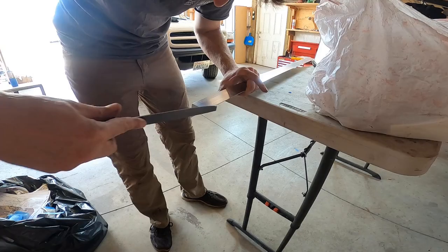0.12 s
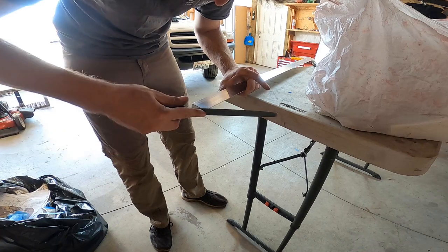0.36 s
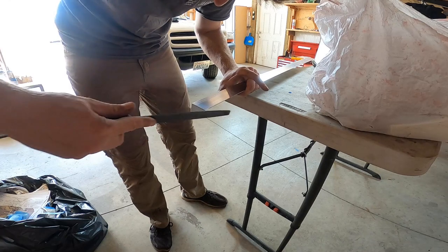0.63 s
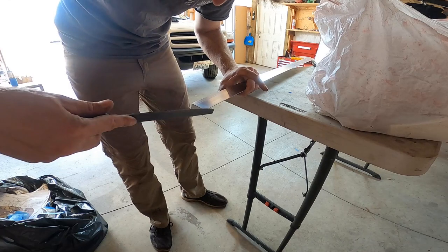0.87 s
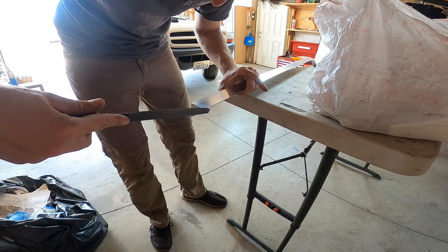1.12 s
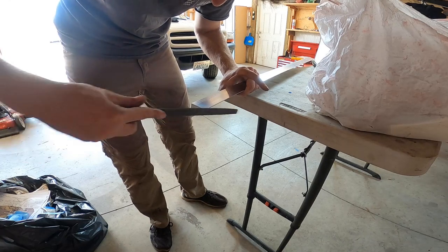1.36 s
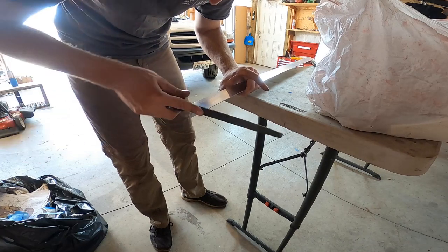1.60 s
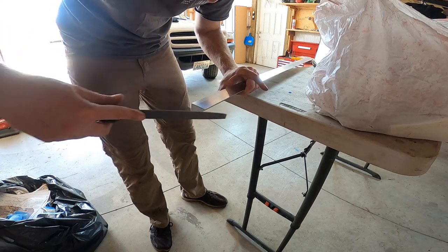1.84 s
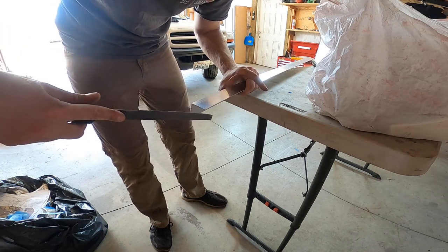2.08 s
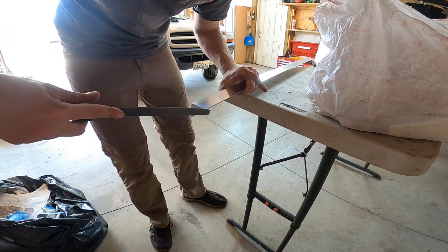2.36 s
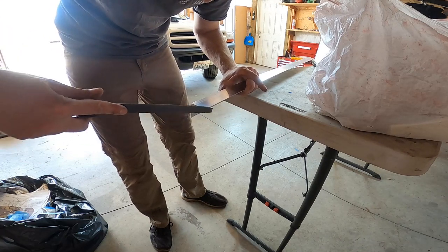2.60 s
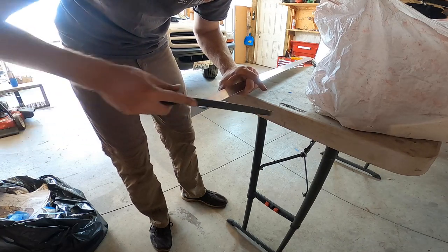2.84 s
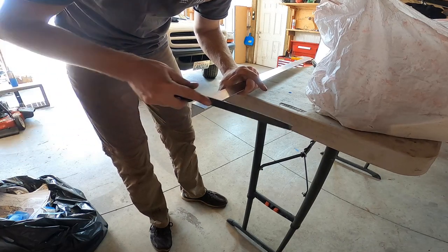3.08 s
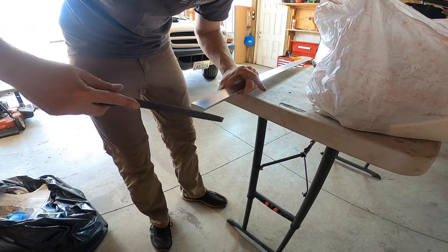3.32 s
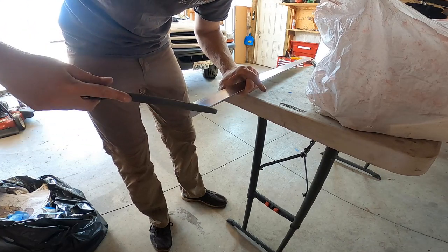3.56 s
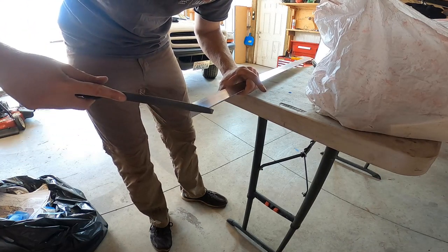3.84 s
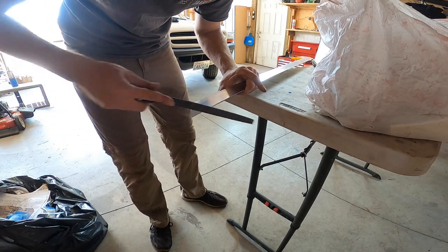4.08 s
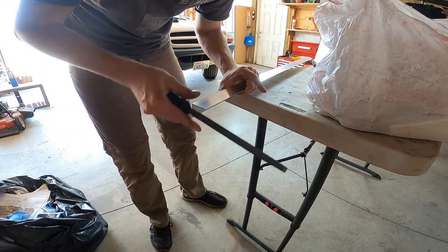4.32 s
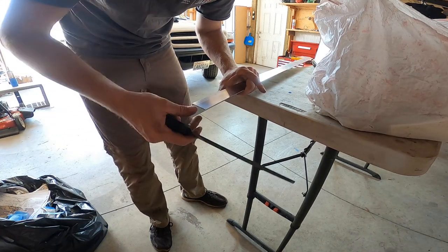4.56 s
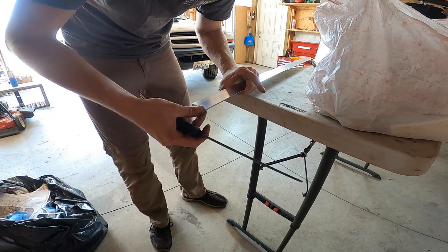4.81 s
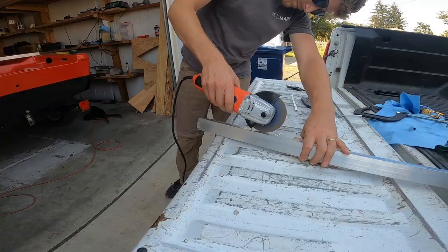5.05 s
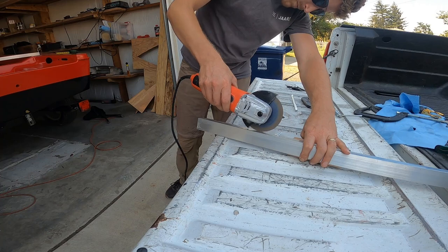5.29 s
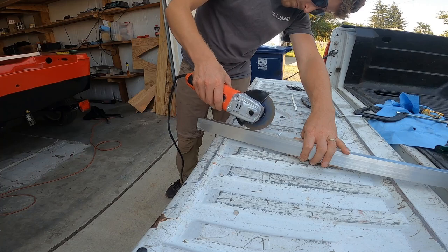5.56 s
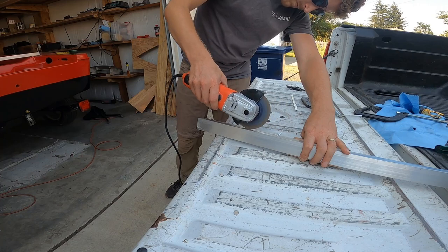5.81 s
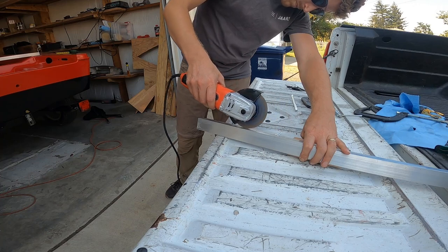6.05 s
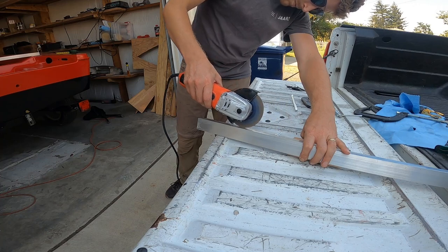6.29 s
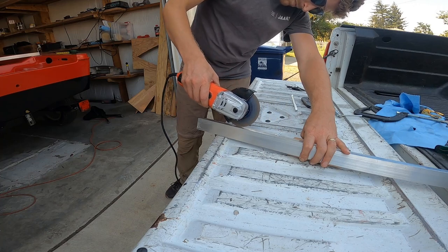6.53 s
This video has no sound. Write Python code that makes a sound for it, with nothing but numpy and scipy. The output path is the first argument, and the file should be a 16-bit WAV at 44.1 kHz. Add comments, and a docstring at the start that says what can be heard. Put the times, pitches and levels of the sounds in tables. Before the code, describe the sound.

A quiet open garage with faint hiss and soft, gusty low rumble, heard close in stereo. At about 0.15 to 0.45 s a hand file is pushed along an aluminium angle: a dry, gritty rasp whose tooth buzz rises into a squeak and drops, leaving a slight ring. A tiny tap follows near 0.65. At 0.95 the file clacks down and drags lightly back, then pushes harder from 1.25 to 1.7, squawking and ringing. Quiet returns. A softer tap at 2.4 and draw lead to the third push, 2.65 to 3.05, with a squeal near 2.9. Another clack at 3.6, a faint slide, and the fourth push, 3.95 to 4.35, rings briefly. Near silence, a faint slide at 4.8, then at 4.86 an abrupt cut to a loud angle grinder already cutting: bright, rough disc hiss and dense, wavering whines, pitch sagging slightly, continuing to the end near 6.65.

```python
"""A hand file is set on an aluminium angle, drawn back and pushed forward four times in an open garage:
noise of the chips excites a broad rasp and the metal's modes, and the teeth buzz at a rate set by stroke speed.
Then the scene changes to an angle grinder already cutting: shaft orders that swell and fade over disc hiss.
Behind the filing lie a sparse-tap garage tail, filtered hiss, gusty rumble and a faint tone.
Two close microphone ports hear it."""
import sys
import numpy as np
from scipy import signal
from scipy.fft import rfft, irfft, next_fast_len
from scipy.io import wavfile
from scipy.ndimage import uniform_filter1d

SR = 44100
rng = np.random.default_rng(int(sys.argv[2]) if len(sys.argv) > 2 else 0)


def boost(x):
    """Linear amplitude factor 10**(x/20) for a level x in decibels (scalar or array-like)."""
    u = np.asarray(x, float) / 20
    return 10 ** u


def bounce(signal):
    """Save signal as a 16-bit WAV file at the path given by the first command-line argument."""
    frames = np.transpose(np.atleast_2d(signal))
    limited = np.clip(frames, -1, 1)
    pcm = np.round(limited * 32767).astype(np.int16)
    wavfile.write(sys.argv[1], SR, pcm)


N = 293706
CUT_S = 4.8555  # filing ends, grinder starts

# tooth rate in each push, one table a push: (time [s], rate [teeth/s], relative buzz level [dB])
TEETH = [
    [(0.19, 410, -47), (0.242, 650, -39.5), (0.262, 970, -62), (0.284, 990, -37), (0.328, 1080, -52),
     (0.345, 1340, -37), (0.38, 1500, -34), (0.4, 900, -31), (0.43, 830, -39), (0.44, 400, -41),
     (0.46, 360, -36), (0.5, 350, -50)],
    [(1.29, 336, -58), (1.314, 450, -43), (1.36, 620, -35.5), (1.426, 650, -35), (1.44, 860, -58),
     (1.49, 1000, -25), (1.512, 690, -35), (1.55, 620, -37.5), (1.568, 440, -50.5), (1.58, 373, -36.5),
     (1.63, 340, -32.5), (1.66, 200, -38), (1.72, 150, -49)],
    [(2.72, 340, -51.5), (2.766, 760, -52), (2.78, 631, -34), (2.84, 960, -63), (2.858, 1000, -24.5),
     (2.895, 1070, -27), (2.92, 1000, -51), (2.94, 860, -60), (2.954, 720, -35.5), (3.002, 670, -45),
     (3.06, 280, -74)],
    [(3.96, 345, -48.5), (4.0, 450, -38.5), (4.04, 640, -52), (4.09, 800, -35.5), (4.112, 890, -25),
     (4.18, 865, -26), (4.195, 800, -38), (4.215, 530, -31.5), (4.25, 480, -47), (4.29, 380, -45.5),
     (4.33, 323, -43)],
]


def evened(x):
    """Scales to rms 1."""
    return x / np.sqrt(np.mean(x ** 2) + 1e-20)


def read(points, hz):
    """Reads a spectrum on a log-frequency axis."""
    f, value = np.transpose(points)
    return np.interp(np.log(hz + 1), np.log(f + 1), value)


def play(tables, column, rest):
    """Joins curve tables over the whole time; the value is rest between them."""
    t, out = np.arange(N) / SR, np.full(N, float(rest))
    for rows in tables:
        rows = np.array(rows)
        inside = (t >= rows[0, 0]) & (t <= rows[-1, 0])
        out[inside] = np.interp(t[inside], rows[:, 0], rows[:, column])
    return out


def colour(x, gain):
    """Filters by a function of Hz."""
    size = next_fast_len(x.shape[-1] + 4096)
    spectrum = rfft(x, size) * gain(np.fft.rfftfreq(size, 1 / SR))
    return irfft(spectrum, size)[..., :x.shape[-1]]


def resonances(rows, hz):
    """Sum of resonance peaks (centre Hz, width Hz, lift dB), in dB."""
    return sum(db / (1 + (2 * (hz - f) / width) ** 2) for f, width, db in rows)


def wander(seconds, count):
    """Slow random curves of rms 1."""
    steps = rng.standard_normal((count, N // 64 + 1))
    for smooth_s in (seconds, seconds / 2):
        steps = uniform_filter1d(steps, max(round(smooth_s * SR / 64), 1), 1)
    return np.repeat(evened(steps), 64, 1)[:, :N]


def patchy(length, patchy_db, seconds, hz_wide):
    """Noise whose level drifts in patches of time and frequency."""
    a, b, patches = rng.standard_normal((length // 256 + 6, 513, 3)).T
    patches = uniform_filter1d(patches, max(round(hz_wide * 1024 / SR), 1), 0)
    patches = evened(uniform_filter1d(patches, max(round(seconds * SR / 256), 1), 1))
    noise = signal.istft((a + 1j * b) * boost(patchy_db * patches), nperseg=1024, noverlap=768)[1]
    return evened(noise[:length])


def mode_ring(modes):
    """Ring of a set of modes after one soft click, energy 1."""
    t = np.arange(SR // 2) / SR
    ring = sum(boost(db - 60 * t / t60) * np.sin(2 * np.pi * hz * t) / np.sqrt(t60) for hz, db, t60 in modes)
    ring *= 1 - np.exp(-(t / 0.00045) ** 2)
    return ring / np.linalg.norm(ring)


def strokes():
    """Pressure and treble in dB over time, and where the file is being pushed."""
    # heavy pushes, one table each: (time [s], pressure [dB], treble over it [dB])
    pushes = [
        [(0.14, -61, -8), (0.16, -38.5, -22), (0.2, -30.5, -15), (0.21, -29, -20.5), (0.244, -30, -14.5),
         (0.344, -27, -13), (0.42, -26.5, -13), (0.47, -56, -14), (0.56, -73, -19)],
        [(1.24, -51, -20), (1.302, -26, -20.5), (1.36, -17.5, -17.5), (1.426, -32, -11.5), (1.458, -21, -13),
         (1.475, -28.5, -11.5), (1.532, -21, -19), (1.582, -27, -12.5), (1.616, -22.5, -23), (1.662, -46, -30),
         (1.78, -70, -10)],
        [(2.62, -44, -15), (2.658, -40.5, -16), (2.742, -24, -21), (2.88, -25.5, -11.5), (2.92, -29.5, -15),
         (2.938, -23, -8.5), (2.984, -21.5, -11), (3.03, -37.5, -12), (3.078, -48.5, -20), (3.2, -93, -13.5)],
        [(3.92, -41, -22.5), (3.982, -27, -23.5), (4.062, -27.5, -15), (4.102, -23.5, -16),
         (4.14, -26.5, -11.5), (4.198, -16.5, -18), (4.256, -26.5, -19.5), (4.314, -50, -25), (4.354, -45, -25),
         (4.42, -75, -21)],
    ]
    # light draws; the file lands, settles to an even slide and lifts:
    # (start [s], end [s], landing level [dB], slide level [dB], treble over it [dB])
    draws = [(0.0, 0.135, -58.5, -70, -18), (0.953, 1.254, -31.5, -43.5, -22.5),
             (2.391, 2.609, -39.5, -36.5, -23), (3.592, 3.973, -33, -41.5, -26),
             (4.8, 4.916, -70, -39, -27)]
    settle_s, lift_s, lift_db, silent_db = 0.057, 0.088, -23.5, -90
    t = np.arange(N) / SR
    press_db, treble_db = play(pushes, 1, silent_db), play(pushes, 2, -28)
    pushed = press_db > silent_db
    for start, end, land_db, slide_db, high_db in draws:
        inside = (t >= start) & (t < end) & ~pushed
        lift = np.clip(1 - (end - t[inside]) / lift_s, 0, 1)
        landing = np.exp(-(t[inside] - start) / settle_s)
        press_db[inside] = slide_db + (land_db - slide_db) * landing + lift_db * lift
        treble_db[inside] = high_db
    return press_db, treble_db, pushed


def rasp_colour(noise):
    """Broad scrape spectrum of the file, rms 1."""
    # relative density: (frequency [Hz], level [dB per Hz])
    rasp_density = [(59, -45.5), (100, -23), (378, -15.5), (530, -21), (861, -31), (1110, 0), (2000, -5),
                    (2270, -8), (2690, 1.5), (4190, -20), (8770, -33), (15500, -70.5)]
    return evened(colour(noise, lambda hz: boost(read(rasp_density, hz))))


def rasp(chips, press, treble_db):
    """Chip noise as a broad scrape, its treble following the stroke."""
    whole = rasp_colour(chips)
    high = evened(colour(whole, lambda hz: 1 / (1 + (4300 / (hz + 1)) ** 16)))
    mid = evened(colour(whole, lambda hz: 1 / (1 + (hz / 4300) ** 16)))
    return press * (boost(-4.5) * mid + boost(treble_db) * high)


def held_ring(chips, press, pushed, held):
    """Chips excite mode groups whose shares change with where the file touches."""
    # base share, one row a group: (in a draw [dB], in a push [dB])
    base_shares = [(-15, -17), (-9.5, -15), (-8.5, -15.5), (-16.5, -14.5)]
    # a group rings out for a moment, one table a group: (peak [s], half-length [s], lift over its share [dB])
    chirps = [
        [(.46, 0.024, 18), (1.02, 0.096, 11), (1.69, 0.099, 20.5), (2.45, 0.069, 9.5), (2.98, 0.11, 5),
         (3.08, 0.043, 10), (4.12, 0.093, 12.5), (4.3, 0.056, 12)],
        [(.21, .02, 15), (1.53, .04, 10.5), (2.68, 0.055, 7), (2.89, 0.035, 15), (4.2, 0.033, 6)],
        [(1.37, 0.012, 10), (1.475, 0.043, 14.5), (2.87, 0.038, 13), (4.2, 0.036, 9)],
        [(.36, 0.035, 10), (1.35, 0.03, 11.5), (1.455, 0.045, 18.5)],
    ]
    shift_db, shift_s = 3, 0.033  # the shares drift as the contact moves
    low_db_per_octave = -4.5  # slow teeth shake the lowest group hardest
    t = np.arange(N) / SR
    shares = np.array([np.where(pushed, push_db, draw_db) for draw_db, push_db in base_shares])
    shares = shares + shift_db * wander(shift_s, count=len(held))
    shares[0] += low_db_per_octave * np.log2(play(TEETH, 1, 500) / 500)
    for group, rows in enumerate(chirps):
        for s, half_s, db in rows:
            shares[group] += db * np.exp(-((t - s) / half_s) ** 2)
    return sum(signal.fftconvolve(press * boost(share_db) * chips, modes)[:N]
               for share_db, modes in zip(shares, held))


def tooth_buzz(whole):
    """Teeth pass the edge at a nearly even rate; overtones light up the modes they cross."""
    turns = np.cumsum(play(TEETH, 1, 500) * (1 + .03 * wander(.005, count=1)[0])) / SR
    overtone_db = [5, -7.0, -10, -12.5]
    tone, *over = (boost(db) * np.cos(2 * np.pi * k * turns) for k, db in enumerate(overtone_db, 1))
    strength = uniform_filter1d(boost(play(TEETH, 2, -90.5)), 300)
    strength *= boost(3.5 * wander(.012, count=1)[0])  # the teeth catch and skip
    ringing = signal.fftconvolve(strength * (0.21 * tone + sum(over)), whole)[:N]
    return 0.75 * strength * tone + boost(-7.0) * ringing


def taps(knock):
    """File laid on or knocking the metal: a modal knock and a short rattle."""
    # (time [s], level before the knock and rattle trims [dB])
    tap_rows = [(0.656, -42.5), (0.955, -19.5), (2.384, -28.5), (3.595, -21)]
    out = np.zeros(N)
    # the file lands along its face, not at one point
    knock = knock * np.minimum(np.arange(len(knock)) / SR / .004, 1) / abs(knock).max()
    fade = boost(-60 * np.arange(3000) / SR / 0.069)
    for (s, db), puff in zip(tap_rows, rng.standard_normal((len(tap_rows), 3000))):
        at = round(s * SR)
        out[at:at + len(knock)] += boost(db - 2.5) * knock
        out[at:at + 3000] += boost(db - 11.5) * rasp_colour(puff) * fade
    return out


def let_go():
    """The file lets go of the metal, whose modes ring free and die."""
    # free modes: (frequency [Hz], relative level [dB], t60 before the ring-time factor [s])
    free_modes = [(365, 2, .2), (1005, -16, .39), (1070, -14, .35), (1195, -14, .5), (2099, -9, .32),
                  (4400, -18, .4)]
    # (time [s], level [dB], favoured frequency [Hz], ring-time factor [-])
    releases = [(0.0, -58, 1195, 1), (0.43, -39, 1195, 1.2), (1.62, -42, 1195, .5), (2.97, -43, 4400, 1.1),
                (2.98, -35, 1005, 1), (4.25, -29, 1170, .7)]
    favour_db, favour_hz = 14, 90
    t = np.arange(SR // 2) / SR
    rise = np.minimum(t / 0.022, 1)
    out = np.zeros(N)
    for s, db, favoured_hz, free in releases:
        at = round(s * SR)
        for hz, mode_db, t60 in free_modes:
            mode_db += db + favour_db / (1 + ((hz - favoured_hz) / favour_hz) ** 2)
            out[at:at + len(t)] += boost(mode_db - 60 * t / (t60 * free)) * rise * np.sin(2 * np.pi * hz * t)
    return out


def file_strokes():
    """Chips, teeth, taps and releases excite a broad rasp and the modes of the metal."""
    # ring of angle and file: (frequency [Hz], relative level [dB], t60 [s])
    edge_modes = [(670, -18.5, 0.077), (832, -6, 0.023), (891, -5, 0.16), (1008, -2, 0.088),
                  (1054, -1, 0.057), (1197, -7.5, 0.55), (1264, -3, 0.1), (1380, -2.5, 0.064),
                  (1676, -10, 0.23), (1780, -4, 0.041), (2296, -6.5, 0.076), (2880, -30, 0.15),
                  (3060, -24.5, 0.17), (3310, -7, 0.099), (3570, -7, .06), (3860, -11, 0.047)]
    # modes that depend on the contact point, one table a group: (frequency [Hz], relative level [dB], t60 [s])
    held_modes = [
        [(197, 3.5, 0.19), (235, 5, 0.1), (278, -2.5, 0.12), (367, 3.5, 0.089), (458, 1, 0.073)],
        [(1540, -15.5, 0.011), (1589, -0.5, .07)],
        [(2055, -2.5, 0.083), (2123, 2, 0.052)],
        [(2492, 2, 0.047), (2580, -6.5, .08), (2735, 0.5, 0.06), (2798, -2.5, 0.039)],
    ]
    ring, held = mode_ring(edge_modes), [mode_ring(modes) for modes in held_modes]
    whole = ring + 0.75 * sum(held[1:])
    press_db, treble_db, pushed = strokes()
    press = signal.lfilter(np.ones(40) / 40, 1, boost(press_db))
    bites_db = 1.5 * wander(.003, count=1)[0] + 1.5 * wander(.02, count=1)[0]  # uneven bites
    chips = evened(patchy(N, 2.4, 0.053, 150) * boost(bites_db))
    out = rasp(chips, press, treble_db)
    out += boost(-7) * signal.fftconvolve(press * chips, ring)[:N]
    out += held_ring(chips, press, pushed, held)
    out += tooth_buzz(whole)
    out += taps(whole + 0.52 * held[0])
    out += let_go()
    return colour(out, lambda hz: 1 / (1 + (150 / (hz + 1)) ** 6))  # little of the filing sounds below about 150 Hz


def grinder_orders(t, turns, start):
    """Wavering tones at whole multiples of the shaft turn; some sing out for a while."""
    # mean level of each shaft order from the first up: (rms level [dB])
    order_levels = [-47, -46.5, -39.5, -50.5, -45, -46, -49.5, -39.5, -42, -39.5, -41.5, -42, -42, -40,
                    -36.5, -41.5, -35.5, -39, -39.5, -32, -32.5, -39, -38, -37, -28, -36.5, -33, -40.5,
                    -33.5, -40.5, -40, -44, -41, -49, -50, -39, -46, -46.5, -38, -45.5, -45, -42.5, -46.5,
                    -41, -40]
    # orders that sing out: (order number [-])
    singers = [1, 2, 3, 5, 8, 11, 12, 15, 16, 19, 21, 23, 32, 33, 34, 39, 40, 43]
    # their songs, one table a singer: (peak [s], half-length [s], peak rms level [dB])
    whistles = [
        [(5.04, 0.094, -36.5), (6.2, 0.71, -41.5)],
        [(5.3, 0.38, -40), (6.05, 0.16, -44)],
        [(5.8, 0.22, -36), (6.35, .3, -38.5)],
        [(4.97, 0.069, -34.5)],
        [(4.93, 0.092, -32), (5.35, .1, -34), (5.8, 0.24, -35.5)],
        [(5.35, 0.29, -29), (6.08, .13, -29), (6.43, 0.24, -23.5)],
        [(6.27, 0.18, -28)],
        [(5.6, .15, -29.5), (6.45, .2, -27)],
        [(5.3, 0.25, -25), (6.23, .12, -32.5)],
        [(5.4, .25, -23), (5.9, .2, -30)],
        [(6.38, .15, -28)],
        [(5.855, 0.13, -27)],
        [(5.02, .08, -23), (6.5, .22, -23)],
        [(5.35, .12, -31.5)],
        [(5.42, 0.15, -22.5), (5.92, .22, -22.5), (6.64, 0.11, -23.5)],
        [(5.346, .12, -28)],
        [(5.65, 0.23, -23)],
        [(5.753, .3, -24.5)],
    ]
    swells = wander(0.14, count=len(order_levels))[:, start:]
    levels = {}
    for k, (db, swell) in enumerate(zip(order_levels, swells), 1):
        swell_db = 1.2 if k < 3.5 else 3.2  # lower orders waver less
        levels[k] = boost(db + swell_db * swell)
    for k, rows, flutter in zip(singers, whistles, wander(0.021, count=len(whistles))[:, start:]):
        song = sum(boost(db) * np.exp(-((t - s) / half_s) ** 2) for s, half_s, db in rows)
        levels[k] = np.hypot(levels[k], boost(1.0 * flutter) * song)
    return sum(np.sqrt(2) * level * np.cos(2 * np.pi * (k * turns + rng.random()))
               for k, level in levels.items())


def disc_hiss(t, turns, start):
    """Noise of the disc in the cut, throbbing once a turn: centre and side parts."""
    # disc in the cut, relative density: (frequency [Hz], level [dB per Hz])
    cut_density = [(18, -89), (30, -52), (263, -22), (300, -16), (351, -19), (607, -11), (768, -16),
                   (899, -8.5), (1920, -12.5), (3240, -6), (4100, -8.5), (4790, -3.5), (7480, -4.5),
                   (13300, -7.5), (15600, -13)]
    # disc, guard and angle resonances: (frequency [Hz], width [Hz], lift [dB])
    disc_modes = [(416, 18, 9), (2610, 240, -4.5), (2660, 43, 12), (3690, 150, 2), (4900, 100, 3),
                  (5270, 55, -4), (5660, 61, -1), (5720, 530, 3.5), (6150, 980, 1), (6400, 140, 6.5),
                  (7330, 55, 2.5), (7570, 110, 9.5), (8050, 39, 3), (8720, 120, 11), (9300, 120, 7.5),
                  (10400, 63, 12.5), (10800, 130, -8), (12180, 36, -6.5), (11550, 120, 7.5),
                  (12300, 60, -1), (12750, 150, 5.5), (14700, 190, 4), (15200, 100, 8)]
    # side gain relative to the centre spectrum: (frequency [Hz], gain [dB])
    side_gain = [(60, -27), (200, -30), (550, -30), (1400, -60), (2200, -103)]
    # load: (time [s], level before trim [dB], extra level of the lower roar as the disc bites [dB])
    load_rows = [(4.859, -14, 2.5), (4.93, -12.5, 3.5), (5.2, -11.5, 2), (5.45, -13.5, 2), (5.7, -12.5, 1),
                 (5.93, -13, 1.5), (6.0, -12.5, 1), (6.2, -11.5, -1.5), (6.35, -13, 1.5), (6.55, -13, -4.5),
                 (6.66, -12.5, -0.5)]
    hiss_db = lambda hz: read(cut_density, hz) + resonances(disc_modes, hz)
    throb = boost(1.5 * np.cos(2 * np.pi * turns) + .8 * wander(.004, count=1)[0, start:])
    # many small modes of the work piece: narrow bands that hold for a good part of a second
    mid = colour(throb * patchy(len(t), 2.3, .6, 45), lambda hz: boost(hiss_db(hz)))
    side = colour(rng.standard_normal(len(t)), lambda hz: boost(hiss_db(hz) + read(side_gain, hz)))
    s, load_db, bite_db = np.transpose(load_rows)
    roar = colour(mid, lambda hz: 1 / (1 + (hz / 2900) ** 8) / (1 + (1100 / (hz + 1)) ** 8))
    mid += (boost(np.interp(t, s, bite_db)) - 1) * roar
    load = boost(np.interp(t, s, load_db) - 2.5) / np.sqrt(np.mean(mid ** 2))
    return load * mid, load * side


def opposed_treble(x):
    """Random short treble patches, to be given opposite sign in the right channel."""
    # (frequency [Hz], share of patches with the right channel's sign flipped [0-1])
    opposed_shares = [(8200, 0), (9000, .12), (11000, .12), (14000, 0.28), (15500, .2)]
    band_hz = 720
    hz, t, z = signal.stft(x, SR, nperseg=2048, noverlap=1024)
    band = (hz // band_hz).astype(int)
    luck = np.repeat(rng.random((band[-1] + 1, len(t) // 2 + 1)), 2, 1)[band, :len(t)]
    chosen = luck < read(opposed_shares, (band + .5) * band_hz)[:, None]
    return signal.istft(z * chosen, nperseg=2048, noverlap=1024)[1][:len(x)]


def grinder():
    """Shaft orders and disc hiss driven by one shaft phase, in two channels."""
    # (time [s], shaft speed [turns/s])
    shaft = [(4.86, 311), (4.93, 313.6), (4.99, 314.6), (5.06, 311.8), (5.15, 307.1), (5.26, 304.3),
             (5.38, 301.7), (5.5, 300), (5.67, 298.4), (5.85, 299.4), (5.96, 300), (6.08, 300.3),
             (6.19, 299.8), (6.33, 297.4), (6.43, 297.8), (6.54, 296.8), (6.66, 296.2)]
    start = round(CUT_S * SR)
    t = np.arange(start, N) / SR
    turns = np.cumsum(np.interp(t, *np.transpose(shaft))) / SR
    turns = turns + 0.0076 * wander(.03, count=1)[0, start:]
    tones = grinder_orders(t, turns, start)
    mid, side = disc_hiss(t, turns, start)
    centre = colour(mid + tones, lambda hz: 1 / (1 + (45 / (hz + 1)) ** 4))
    right = centre - 2 * opposed_treble(centre) - side  # minus twice a patch turns its sign
    out = np.zeros((2, N))
    out[:, start:] = np.array([centre + side, right]) * np.minimum((t - CUT_S) / .003, 1)
    return out


def port_lift(hz):
    """Resonances of the microphone ports, dB."""
    # (frequency [Hz], width [Hz], lift at full strength [dB])
    port_modes = [(4390, 150, 17), (5770, 130, 14), (7300, 300, 6), (8600, 300, 8)]
    return resonances(port_modes, hz)


def ports(x):
    """Each port hears the file with its own lean and delay, and rings a little."""
    # (frequency [Hz], left over right [dB])
    lean = [(60, -2), (110, 1.5), (200, 0), (380, 1), (700, 0.5), (1290, -1.5), (2380, 4), (4400, 2.5),
            (8120, -13), (15000, -15)]
    lag_s = 5.5e-5  # the left port hears the file later
    x = colour(x, lambda hz: boost(0.11 * port_lift(hz)))
    left = colour(x, lambda hz: boost(read(lean, hz) / 2) * np.exp(-2j * np.pi * hz * lag_s))
    right = colour(x, lambda hz: boost(-read(lean, hz) / 2))
    return np.array([left, right])


def garage(x):
    """Sparse taps of random sign, each band dying at its own speed."""
    # (frequency [Hz], t60 [s])
    decay = [(150, 0.28), (1000, 0.33), (4000, 0.38), (12000, 0.26)]
    echoes = np.zeros((2, SR))
    at = np.arange(300, SR - 20, 20) + rng.integers(0, 20, (2, (SR - 301) // 20))
    np.put_along_axis(echoes, at, rng.choice([-1., 1.], at.shape), 1)
    echoes[1] = 0.37 * echoes[0] + 0.33 * echoes[1]  # close ports share much of the tail
    hz, t, z = signal.stft(echoes, SR, nperseg=256)
    tail = signal.istft(z * boost(-60 * t / read(decay, hz)[:, None]), SR, nperseg=256)[1]
    return signal.fftconvolve(x[None], tail / np.linalg.norm(tail[0]), axes=1)[:, :N]


def gusts():
    """Level of the rumble: slow lumps, and puffs that swell and die away."""
    # puffs of low rumble on the ports: (peak time [s], level added at the peak [dB])
    puffs = [(0.1, -55.5), (0.33, -55), (0.92, -68.5), (1.33, -54.5), (1.68, -44), (2.46, -55), (3.05, -50),
             (3.501, -65.5), (3.8, -53), (4.24, -48.5), (4.5, -65)]
    rumble_db, lump_db, rise_s, fall_s = -62, 3.5, .07, 0.039
    t = np.arange(N) / SR
    out = boost(rumble_db + lump_db * wander(.1, count=1)[0])
    for s, db in puffs:
        out += boost(db) * np.exp(-((t - s) / np.where(t < s, rise_s, fall_s)) ** 2)
    return out


def air():
    """Filtered-noise hiss of the place, a faint wavering tone and a lumpy rumble."""
    # relative density: (frequency [Hz], level [dB per Hz])
    air_density = [(12, -37.5), (20, -8), (85, -10.5), (123, -18.5), (235, -17.5), (261, -21), (599, -46),
                   (649, -33), (2610, -35), (3060, -34.5), (3700, -45), (4460, -44), (12000, -63.5),
                   (15600, -101), (22000, -120)]
    # (frequency [Hz], left-right likeness [0-1])
    likeness = [(60, 0.74), (240, 0.57), (950, 0.52), (3770, 0.26), (15000, 0.15)]
    # faint tone in the quiet: (frequency [Hz], centre rms level [dB])
    tone_hz, tone_db = (2988, -84)
    hiss_db = -60
    a, b, c = rng.standard_normal((3, N))
    same = lambda hz: np.clip(read(likeness, hz), 0, 1)
    pair = np.array([a, colour(a, same) + colour(b, lambda hz: np.sqrt(1 - same(hz) ** 2))])
    hiss = boost(hiss_db) * evened(colour(pair, lambda hz: boost(read(air_density, hz) + port_lift(hz))))
    rumble = evened(colour(c + .15 * pair, lambda hz: (hz / 36) ** 4 / (1 + (hz / 36) ** 5.2)))
    tone_level = np.sqrt(2) * boost(tone_db + 3 * wander(.05, count=1))
    tone = tone_level * np.sin(2 * np.pi * tone_hz * np.arange(N) / SR)
    return hiss + tone + gusts() * rumble * boost([[.5], [-.5]])


def scene():
    """Filing until the cut, then the grinder."""
    dry = file_strokes()
    filing = ports(dry) + boost(-10.5) * garage(dry) + air()
    return filing * (np.arange(N) < CUT_S * SR) + grinder()


def top_cut(x):
    """Nothing passes above the cut-off."""
    return signal.sosfilt(signal.butter(12, 15700, fs=SR, output="sos"), x)


def record(dry):
    """Peaks are rounded off."""
    mix = 1.443 * np.tanh(dry / 1.361)
    return top_cut(mix)


dry = scene()
out = record(dry)
bounce(out)
```